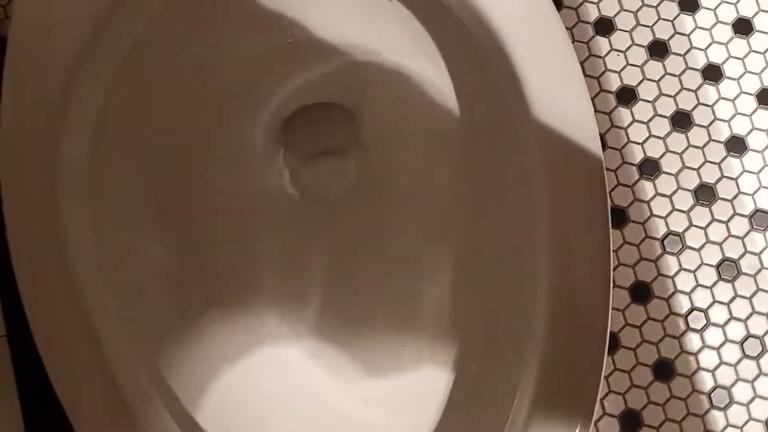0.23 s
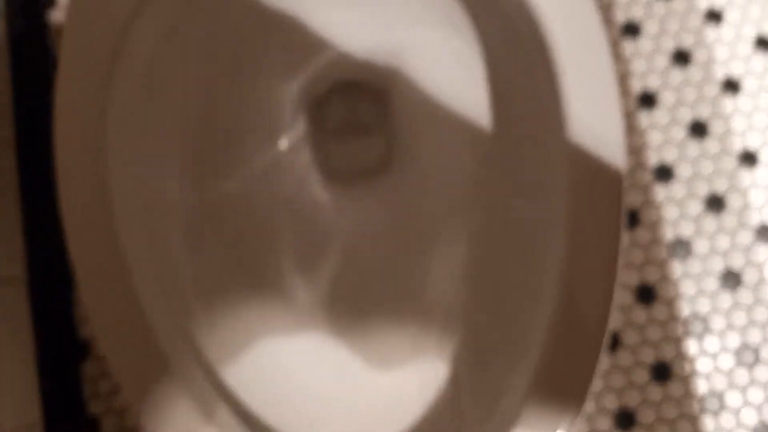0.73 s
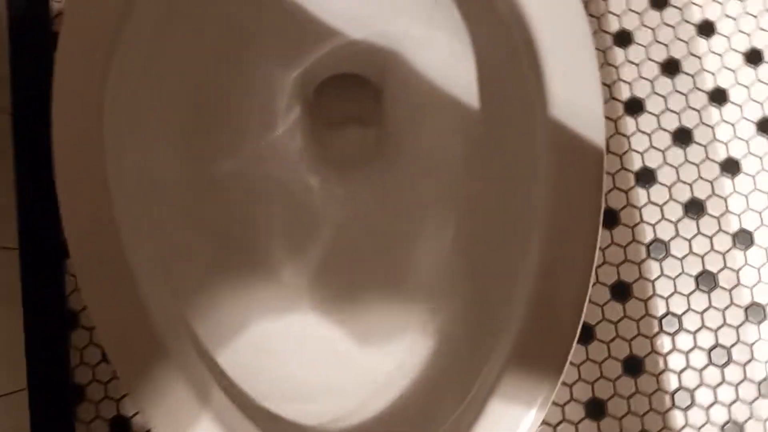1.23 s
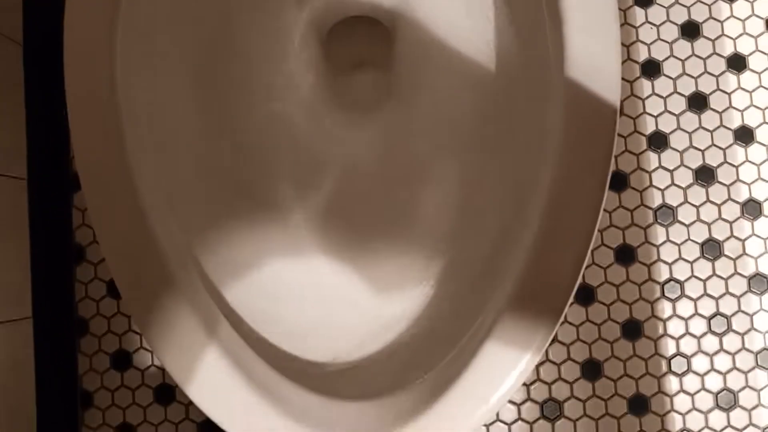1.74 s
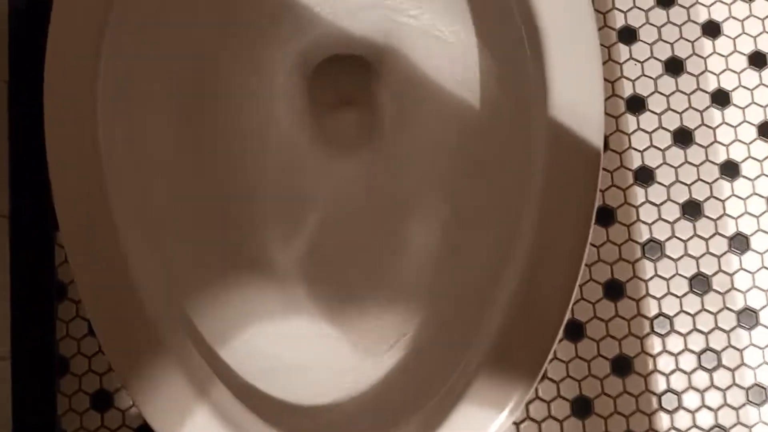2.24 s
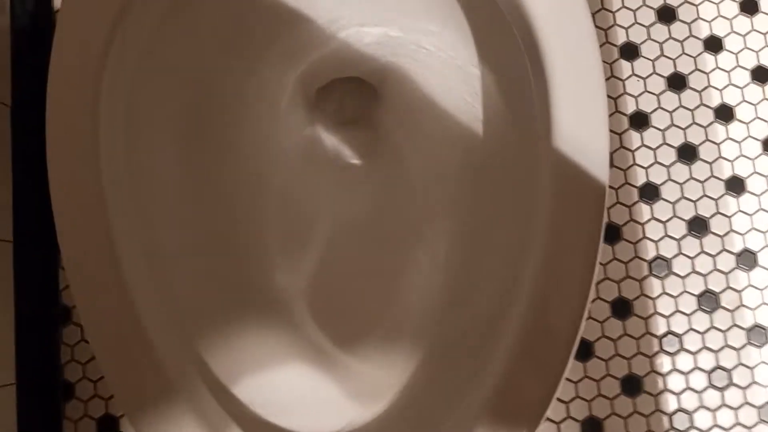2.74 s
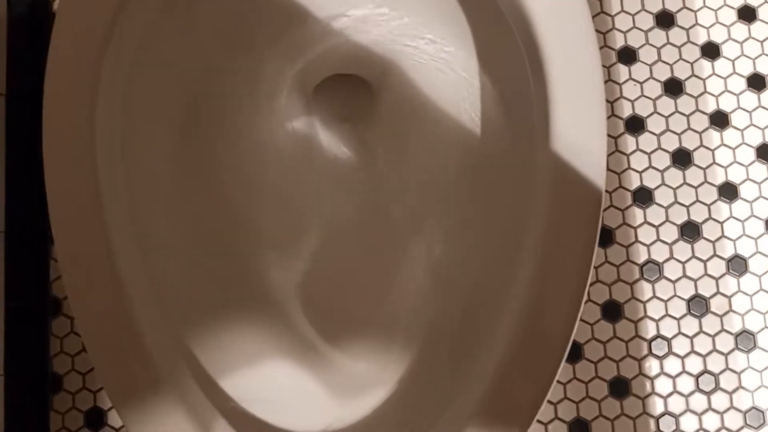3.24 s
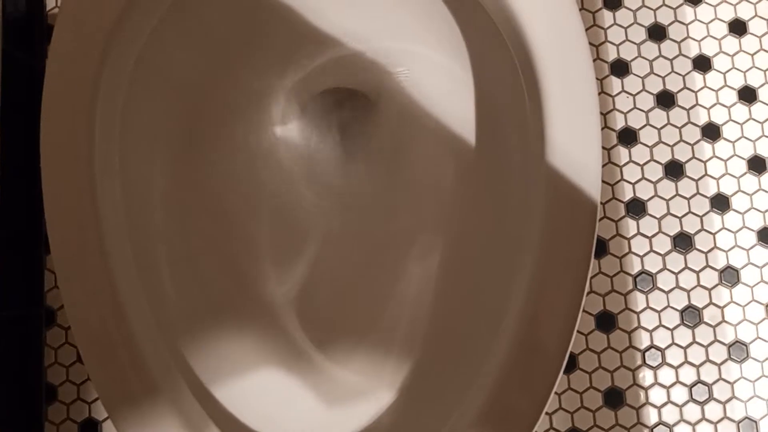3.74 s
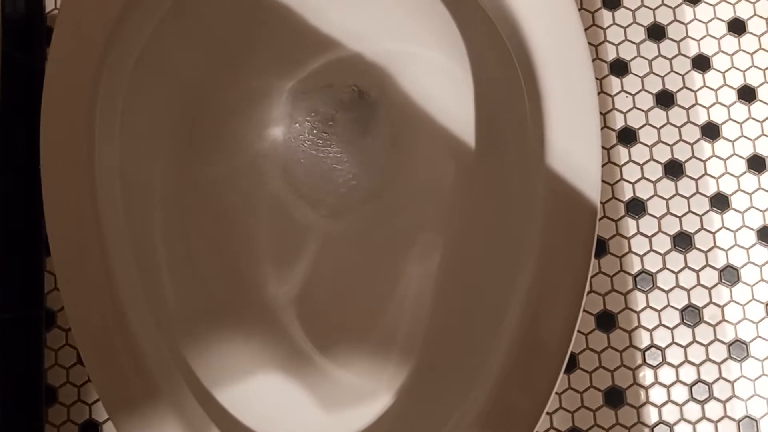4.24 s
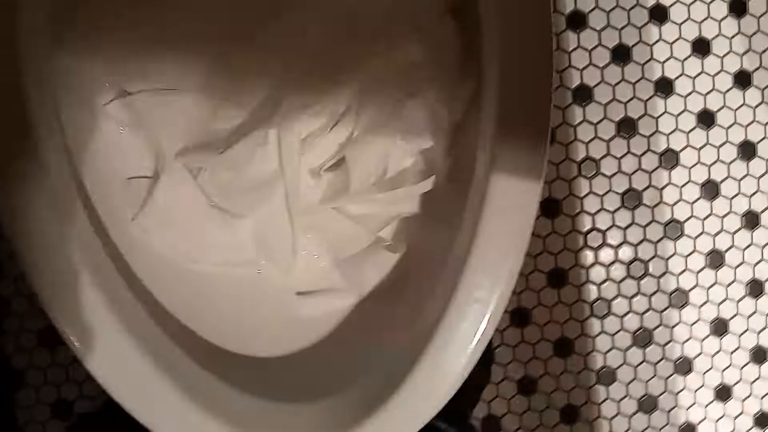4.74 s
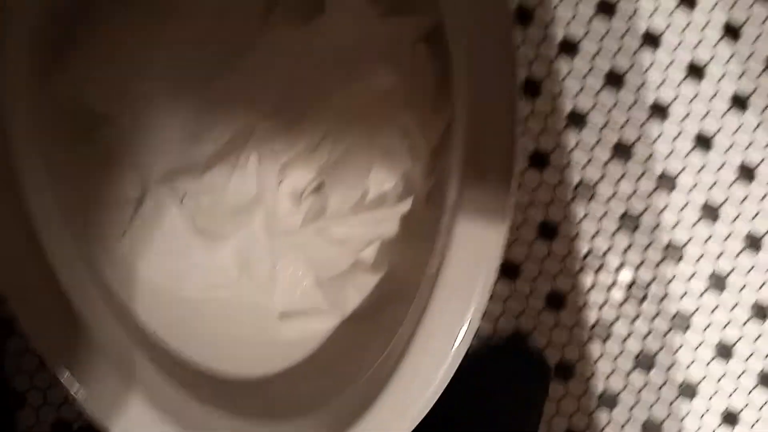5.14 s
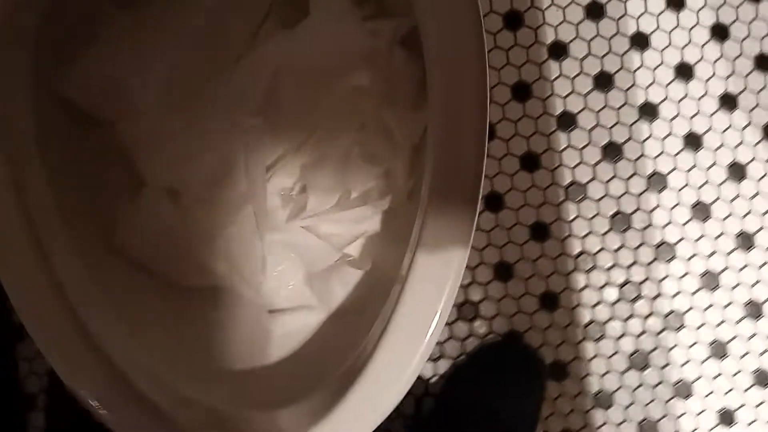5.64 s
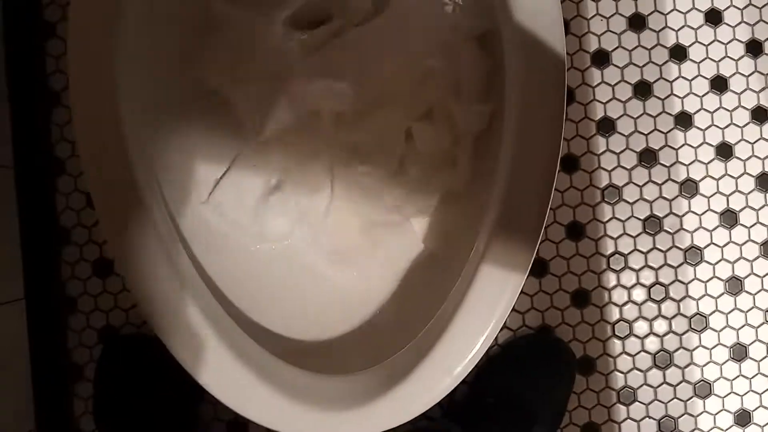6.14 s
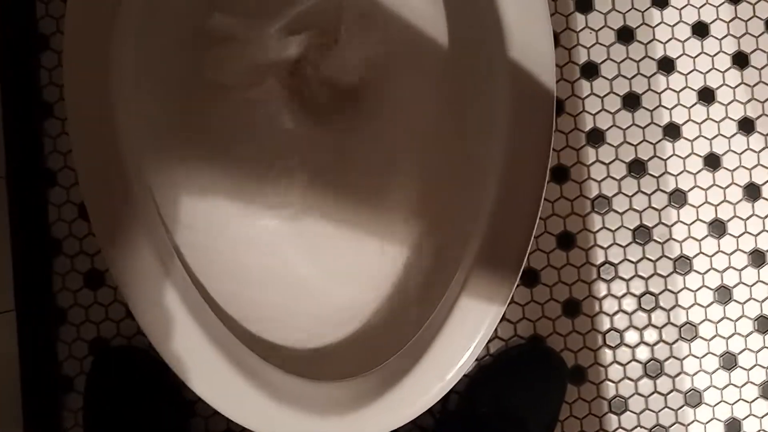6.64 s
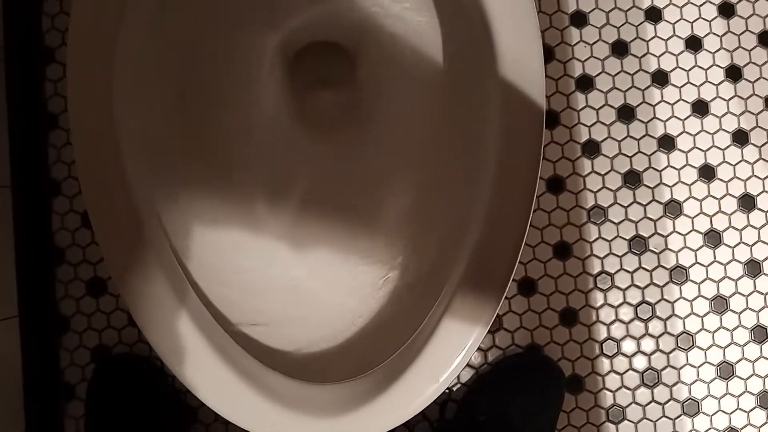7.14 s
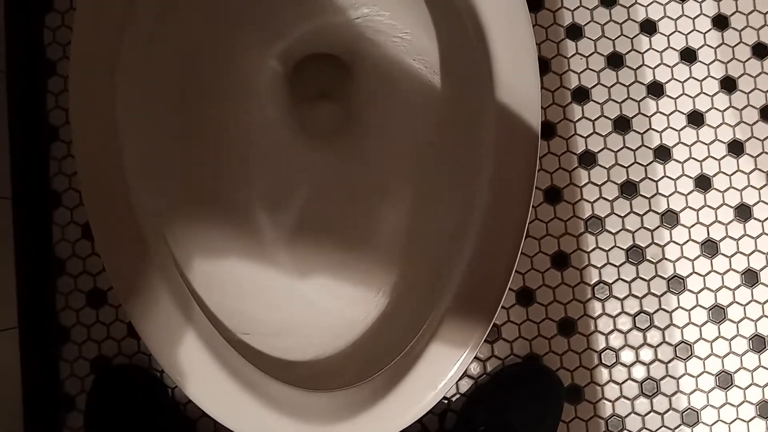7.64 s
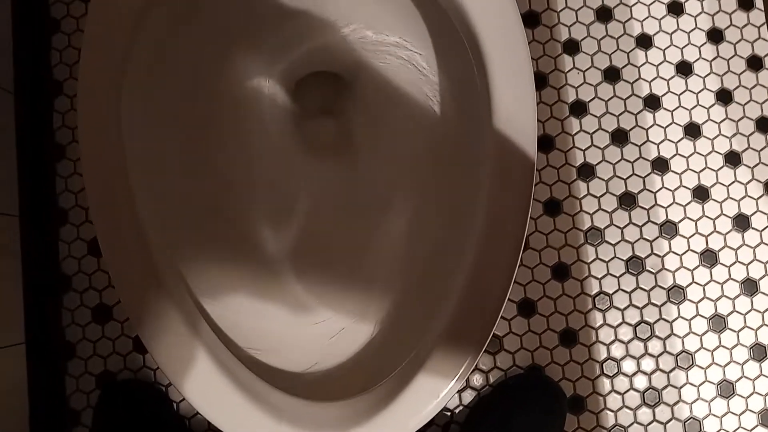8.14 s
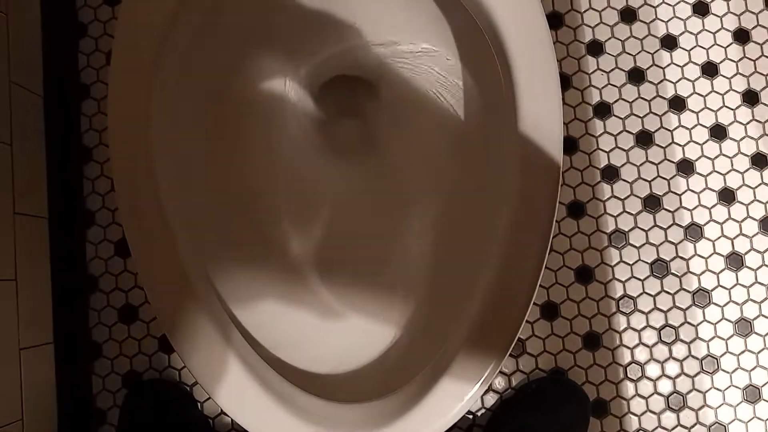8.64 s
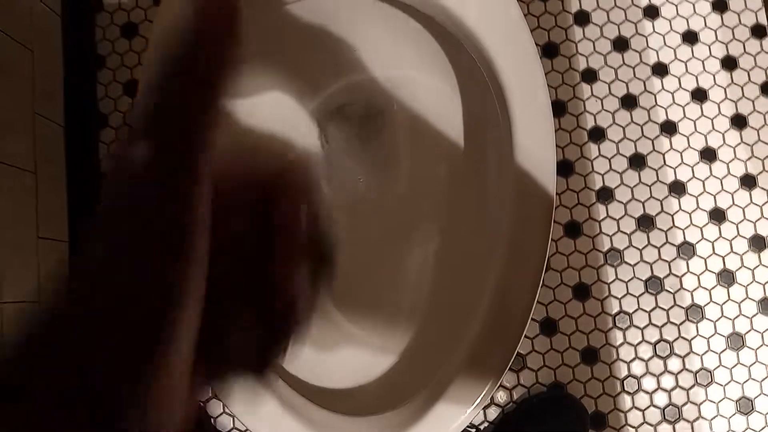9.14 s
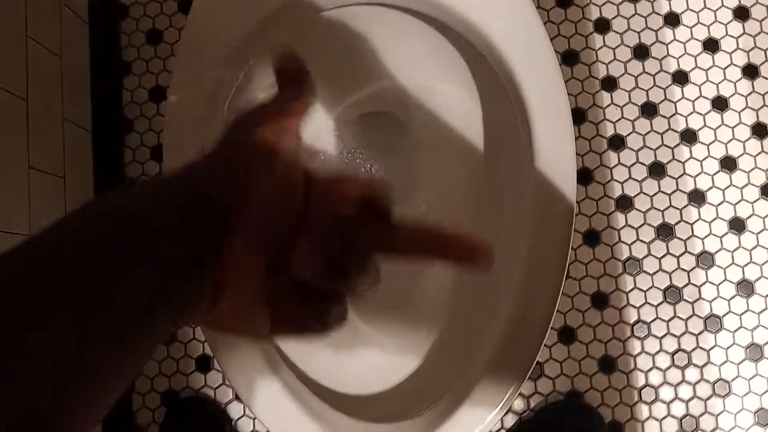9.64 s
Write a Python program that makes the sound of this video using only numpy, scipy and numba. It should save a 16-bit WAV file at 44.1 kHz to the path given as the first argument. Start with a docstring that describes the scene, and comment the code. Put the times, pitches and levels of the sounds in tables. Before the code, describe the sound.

A commercial pressure-valve toilet, heard close over the bowl in a tiled stall, is already rushing at the start. It gulps hard, breaks into bright splashing spray, then thins to trickle and fan hum. After a short cut to silence, a second flush opens with pipe thuds and a thin valve squeal, gurgles longer, sprays and dies away under the hum. Wide stereo.

```python
"""Water is already rushing and gulping through the trap of a pressure-valve toilet as its first flush opens
cold. Place: a tiled stall with a fan; distance: a phone held over the bowl; microphone: two ports, left and
right. The sound breaks off, and after a short silence the scene changes to a second flush. Swarms of ringing
bubbles over noise make the gurgle, slosh, spray, valve hiss and pipe rumble; damped sines make the gulps, ticks
and plops; wavering sines make fan and squeal. The stall lifts the water on its low modes; levels follow one
flush cycle, run at each flush's own pace."""
import sys
import numpy as np
from scipy import signal
from scipy.fft import rfft, irfft, next_fast_len
from scipy.io import wavfile
from scipy.ndimage import uniform_filter1d
from numba import njit

SR = 44100
rng = np.random.default_rng(int(sys.argv[2]) if len(sys.argv) > 2 else 0)


def log_audio(samples):
    """Write samples as a 16-bit WAV file to the path given in sys.argv[1]."""
    # one column per channel
    frames = np.atleast_2d(samples).T
    # limit to full scale, then quantise
    limited = np.clip(frames, -1, 1)
    pcm = np.round(limited * 32767).astype(np.int16)
    wavfile.write(sys.argv[1], SR, pcm)


N = 436590

TIME = np.arange(N) / SR
SIZE = next_fast_len(N + SR)
LOG_HZ = np.log(np.arange(SIZE // 2 + 1) * SR / SIZE + 1)


def undb(db):
    """Turn dB into gain."""
    return 10 ** (np.asarray(db) / 20)


def unit(x):
    """Scale to rms 1."""
    return x / np.sqrt(np.mean(x ** 2))


def columns(rows):
    """Draw each column of a curve at every sample."""
    s, *values = np.transpose(rows)
    return [np.interp(TIME, s, v) for v in values]


def ramp(start, length):
    """Climb from 0 at start to 1 at start + length."""
    return np.clip((TIME - start) / length, 0, 1)


def response(points):
    """Draw the gain at every frequency from (frequency [Hz], level [dB]) points."""
    hz, db = np.transpose(points)
    return undb(np.interp(LOG_HZ, np.log(hz), db))


def filtered(x, gain):
    """Apply a gain per frequency."""
    return irfft(rfft(x, SIZE) * gain, SIZE)[..., :N]


def walk(rate):
    """Random levels held 1 / rate s and slewed twice; spread near 1."""
    hold = int(SR / rate)
    steps = np.repeat(rng.standard_normal(N // hold + 1), hold)
    return 1.6 * uniform_filter1d(uniform_filter1d(steps, hold), hold)[:N]


def surges(rate, fall_s):
    """Sudden swells, about rate per second, that die away; mean 0, spread 1."""
    kicks = (rng.random(N) < rate / SR) * rng.random(N)
    keep = np.exp(-1 / (fall_s * SR))
    swell = signal.lfilter([1], [1, -keep], uniform_filter1d(kicks, size=60))
    swell = np.tanh(unit(swell) / 2)
    return unit(swell - swell.mean())


@njit
def ring(n, start, turn, keep, glide, size):
    """Damped sines that swell over their first cycle and rise in pitch as they die."""
    out = np.zeros(n)
    for k in range(len(start)):
        phase, step, level, i = 0., turn[k], size[k], start[k]
        while level > .02 * size[k] and i < n:
            out[i] += level * min(phase / (2 * np.pi), 1.) * np.sin(phase)
            phase += step
            step = min(step * glide[k], 2.8)
            level *= keep[k]
            i += 1
    return out


def bubbles(s, hz, t60, db, rise):
    """Bubbles decay at 60 dB per t60 s while their pitch climbs at the share rise per t60."""
    length = t60 * SR
    start = (s * SR).astype(np.int64)
    keep = 1000. ** (-1 / length)
    glide = (1 + rise) ** (1 / length)
    return ring(N, start, 2 * np.pi * hz / SR, keep, glide, undb(db))


def events(s, db, hz, t60, rise, rough, rough_hz):
    """Single bursts; a quick random tremor spreads their ring over a band."""
    return (1 + rough * walk(rough_hz)) * bubbles(s, hz, t60 + 0 * s, db, rise)


def tone(hz, width_hz, waver):
    """A sine whose level and phase waver over a narrow band."""
    phase = 2 * np.pi * np.cumsum(hz + 0 * TIME) / SR
    in_phase = (1 + waver * walk(width_hz)) * np.sin(phase)
    quarter = waver * walk(width_hz) * np.cos(phase)
    return unit(in_phase + quarter)


# low modes of the tiled stall: (frequency [Hz], width [Hz], boost [dB])
STALL_MODES = [(97.4, 6.3, 13), (142.2, 8.7, 13), (213.9, 5.4, 17), (322.8, 40, 12.5), (406, 15, 16),
               (485.7, 11, 9.5), (642, 27, 10), (793, 3.4, 17.5), (1094, 7.7, 11), (1220, 21, 8.5),
               (1358, 41, 10.5), (1663, 7.6, 12.5), (1913, 9.2, 9), (2060, 18, 10), (2187, 11, 9)]


def stall():
    """The tiled stall lifts whatever falls on its low modes; higher up they crowd into a fixed ripple."""
    hz = np.exp(LOG_HZ)
    grid = np.arange(0, SR / 2, 45.)
    ripple = np.interp(hz, grid, rng.standard_normal(len(grid)))
    low = 1 + sum((undb(db) - 1) / (1 + (2 * (hz - f) / w) ** 2) for f, w, db in STALL_MODES)
    return low * undb(3 * ripple * (hz > 2400))


SHIFT, SHIFT_PER_S = .02, 3.  # moving water retunes the modes by up to this share, this often


def retuned(modes):
    """The same modes moved up and down a little."""
    bins = np.arange(len(modes))
    return [np.interp(bins * (1 + way * SHIFT), bins, modes) for way in (-1, 1)]


def water(spectrum, cycles, spread_db, noise_db, flicker_db, count, modes, shifting=False):
    """Two unrelated streams (mid, side) of bubbles over turbulence; both flicker together."""
    streams = []
    low, high = np.log([spectrum[1][0], spectrum[-2][0]])
    for _ in range(2):
        when, pitch, big = rng.random((count, 3)).T
        hz = np.exp(low + (high - low) * pitch)
        # pitches lie evenly per octave: lift the high ones so the swarm is flat per Hz
        db = -spread_db * np.log(big + 0.0079) + 20 * np.log10(hz)
        swarm = bubbles(when * N / SR, hz, cycles / hz, db, 0.27)
        streams.append(unit(swarm) + undb(noise_db) * rng.standard_normal(N))
    streams = np.array(streams)
    out = filtered(streams, response(spectrum) * modes)
    if shifting:
        turn = np.clip(walk(SHIFT_PER_S), -1, 1)
        first, second = (filtered(streams, response(spectrum) * r) for r in retuned(modes))
        # crossfade between the modes in place and the two shifted sets
        out = (1 - abs(turn)) * out + np.maximum(turn, 0) * second + np.maximum(-turn, 0) * first
    return out / np.std(out[0]) * undb(flicker_db)


# the two flushes as the microphone hears them: (sound on [s], sound off [s])
SHOTS = [(0, 4.4985), (4.816, 9.9)]
# stages of each flush: (valve opens [s], trap breaks [s], valve shuts [s], drone and trap trim [dB],
#   drone trim after the break [dB], slosh trim [dB], valve hiss drowns from [s], sinks over [s],
#   comes clear [s], depth [dB], paper muffles the surface by [dB], washed away at [s], over [s])
FLUSHES = [(-.5, 0.598, 3.245, 0.5, 0.5, 0.5, 0.38, 0.51, 0.724, -28.5, -2.5, .7, 0.017),
           (4.855, 5.938, 8.467, 1, -2.5, -1, 5.646, 0.4, 6.58, -25, -6, 6.65, 0.28)]
# one flush cycle before the trims: (time since the valve opened [s], drone [dB], trap low mode [dB],
#   trap high mode [dB], slosh [dB], jet spray [dB], valve hiss [dB])
CYCLE = [(-.01, -77, -65, -75, -73, -81, -93), (.005, -48, -53, -53, -45, -43.5, -58),
         (.09, -32, -35.5, -36.5, -38.5, -37.5, -51), (.25, -31, -26.5, -36, -42, -40, -52),
         (.55, -38, -28, -35.5, -39, -33, -38.5), (.85, -34.5, -30, -34, -36, -32, -38),
         (1.03, -36.5, -35, -32, -35, -32.5, -34.5), (1.17, -33, -21.5, -26, -31.5, -33, -35.5),
         (1.22, -42.5, -35.5, -33, -31, -25.5, -31), (1.32, -33.5, -37, -29, -27.5, -26.5, -39),
         (1.52, -45, -40, -28.5, -28.5, -23.5, -35.5), (1.65, -55, -49.5, -39, -29, -25, -38.5),
         (2.2, -59, -50, -50.5, -35, -33, -41), (2.6, -58, -51, -45.5, -40, -36, -40.5),
         (3.1, -52.5, -54, -50.5, -41, -37.5, -42), (3.548, -63, -61.5, -54, -46, -43, -48),
         (3.9, -57.5, -60.5, -62, -57, -55.5, -61.5), (5.05, -60, -56, -70, -83.5, -72, -78)]
BREAKS_S, SHUTS_S = 1.1, 3.55  # trap breaks and valve shuts, within the cycle
CLEAR_S = 0.053  # the drowned hiss comes clear over this long
# the trap chokes and falls quiet for a moment: (time [s], level change [dB], half length [s])
LULLS = [(0.288, -6.5, 0.061), (0.493, -14, 0.029), (5.89, -2, 0.039), (6.446, -6.5, 0.077)]
# the surface wash swells or slackens: (time [s], slosh change [dB], spray change [dB], half length [s])
SWELLS = [(0.86, 1.5, 2.5, 0.042), (1.077, 6, 1, 0.04), (1.317, -6, -1.5, 0.031), (1.653, -6, -3, 0.32),
          (1.84, 2, 3.5, 0.047), (2.4, -0.5, 2.5, 0.13), (3.04, 3.5, 5, 0.14), (5.035, -1.5, -5.5, 0.066),
          (5.947, -5, 1, 0.085), (6.12, -1, -7.5, 0.028), (6.89, 0.5, 1.5, 0.067), (7.953, 0, -2, 0.098),
          (8.164, -1.5, 3, 0.1)]


def cycle():
    """Levels (dB) of six streams: every flush runs the same cycle at its own pace."""
    s, *levels = np.transpose(CYCLE)
    out = np.zeros((6, N))
    for (on, _), row in zip(SHOTS, FLUSHES):
        (opens, breaks, shuts, trap_db, drone_db, slosh_db,
         drowns, sinks, clear, depth_db, paper_db, gone, wash) = row
        age = np.interp(TIME, [opens - 1, opens, breaks, shuts, shuts + 2],
                        [-1, 0, BREAKS_S, SHUTS_S, SHUTS_S + 2])
        db = np.array([np.interp(age, s, v) for v in levels])
        db[:3] += trap_db
        db[0] += drone_db * ramp(breaks, .1)
        db[3] += slosh_db
        # paper damps the slosh less than the spray
        db[3:5] += np.outer([.6, 1], paper_db * (1 - ramp(gone - wash, wash)))
        db[5] += depth_db * ramp(drowns, sinks) * (1 - ramp(clear - CLEAR_S, CLEAR_S))
        out[:, TIME >= on] = db[:, TIME >= on]
    for at, db, half in LULLS:
        out[:3] += db * np.exp(-((TIME - at) / half) ** 2)
    for at, *db, half in SWELLS:
        out[3:5] += np.outer(db, np.exp(-((TIME - at) / half) ** 2))
    return out


# spectrum of the drone, before the stall: (frequency [Hz], level [dB per Hz])
DRONE = [(120, -94), (170, -29), (190, -10), (245, -1), (280, -26.5), (400, -72.5)]


def drone(modes):
    """Low drone of the water: few, large bubbles under strong turbulence."""
    return water(DRONE, 14.0, 0.55, 16.0, 0.43 * walk(18.0), 400, modes)


# spectra of the trap's low and high modes, before the stall: (frequency [Hz], level [dB per Hz])
GURGLE_LOW = [(170, -83.5), (230, -12), (275, -2), (340, -3), (420, -2.5), (500, -2), (580, -23.5),
              (800, -65.5)]
GURGLE_HIGH = [(350, -79.5), (480, -14.5), (560, -2.5), (700, 1.5), (880, -7.5), (1050, -7.5), (1500, -63)]


def gurgle_low(modes):
    """Low mode of the trap: bubbles ringing long under turbulence."""
    return water(GURGLE_LOW, 54.0, 0.69, 10.6, 0.18 * walk(38.0), 1500, modes)


def gurgle_high(surge, modes):
    """High mode of the trap: bubbles whose stall modes drift as the water moves."""
    return water(GURGLE_HIGH, 25.0, 0.58, 11.9, 2.0 * walk(26.0) + 0.79 * surge, 2500, modes, shifting=True)


# spectrum of the slosh, before the stall: (frequency [Hz], level [dB per Hz])
SLOSH = [(550, -71.5), (800, -4.5), (980, -1), (1350, -3), (1700, -3.5), (2300, -1.5), (2900, -4.5),
         (3500, -19), (5000, -73.5)]


def slosh(surge, modes):
    """Bubbles sloshing at the surface, surging with the spray and the hiss."""
    return water(SLOSH, 70., 1.0, 11.0, 1.1 * surge + 0.65 * walk(25.), 3000, modes, shifting=True)


# spectrum of the rim jets' spray, before the stall: (frequency [Hz], level [dB per Hz])
SPRAY = [(1800, -67), (2600, -9), (3300, -7.5), (4100, -7), (4700, -5.5), (5500, -7.5), (6400, -5),
         (7400, -9.5), (8300, -20.5), (13800, -35.5), (15300, -21), (16000, -11)]
# bright core of the spray, as a filter: (frequency [Hz], gain [dB])
JET_CORE = [(2500, -61), (3900, -22.5), (4400, -2.5), (5000, 3.5), (5600, 8), (6300, -6.5), (7200, -24),
            (10000, -54)]
CORE_DB, CORE_PER_DB = -7.5, 0.5  # core trim with the spray at -27 dB, and its growth per dB of spray
# further trim of the core, one entry per flush: (level [dB])
CORE_BY_FLUSH_DB = [0, -3.5]


def spray(spray_db, surge, modes):
    """Rim jets: a dense swarm of small bubbles whose bright core grows with the level."""
    jets = water(SPRAY, 34.0, 4.2, 7.8, 1.0 * surge + 0.6 * walk(30.), 20000, modes)
    flush_db = np.where(TIME < SHOTS[1][0], *CORE_BY_FLUSH_DB)
    core_db = CORE_DB + flush_db + CORE_PER_DB * (spray_db + 27.0)
    return jets + undb(core_db) * filtered(jets, response(JET_CORE))


# spectrum of the valve hiss, before the stall: (frequency [Hz], level [dB per Hz])
HISS = [(5500, -67.5), (7500, -10), (8800, -6.5), (10500, -5), (12500, -5.5), (13800, -6.5), (15300, 3),
        (16000, -13.5)]
OPEN_HZ, OPEN_WIDTH_HZ, OPEN_DB = 10970, 2600, -1  # band added to the hiss until it comes clear


def valve(surge, modes):
    """Hiss of the valve, gathered in one bright band early in each flush."""
    hiss = water(HISS, 48.0, 2.0, 2.1, .5 * surge + 1.1 * walk(22.0), 20000, modes)
    early = sum((TIME >= on) * (TIME < row[8]) for (on, _), row in zip(SHOTS, FLUSHES))
    band = undb(OPEN_DB) / (1 + (2 * (np.exp(LOG_HZ) - OPEN_HZ) / OPEN_WIDTH_HZ) ** 4)
    return hiss + early * filtered(hiss, band)


def flush(modes):
    """Streams of water and air, as mid and side; shared surges tie the surface, high trap mode and hiss."""
    drone_db, low_db, high_db, slosh_db, spray_db, hiss_db = cycle()
    surge = surges(18., 0.018)
    out = undb(drone_db) * drone(modes)
    out = out + undb(low_db) * gurgle_low(modes)
    out = out + undb(high_db) * gurgle_high(surge, modes)
    out = out + undb(slosh_db) * slosh(surge, modes)
    out = out + undb(spray_db) * spray(spray_db, surge, modes)
    return out + undb(hiss_db) * valve(surge, modes)


# large air pockets, and the low thump at 144 Hz as the valve opens at 4.93 s, before the stall and a common
# trim: # (time [s], level [dB], pitch [Hz], length [s])
GULPS = [(.0, -19.5, 392, .2), (.33, -21.5, 388, .12), (.47, -21.5, 678, 0.03), (.65, -16, 316, 0.045),
         (.6, -12, 628, .13), (.735, -23, 1167, 0.042), (.79, -20, 1380, .03), (1.16, -21.5, 1087, .08),
         (1.38, -29, 1464, 0.033), (1.379, -26.5, 690, 0.045), (1.74, -32.5, 1315, .09),
         (1.78, -27.5, 1550, 0.057), (1.95, -27, 706, .08), (2.293, -31, 958, .06), (4.93, -13.5, 144, .12),
         (5.04, -18, 394, 0.095), (5.16, -16, 375, .08), (5.2, -24, 660, .05), (5.29, -21, 630, .08),
         (5.36, -22, 408, .05), (5.5, -25.5, 654, 0.037), (5.59, -23.5, 650, .08), (5.69, -23, 400, .04),
         (5.79, -29, 647, .04), (6.03, -19, 399, 0.087), (6.1, -22.5, 1088, 0.13), (6.164, -18, 649, 0.037),
         (6.284, -16, 708, 0.065), (6.2, -25, 870, 0.098), (6.34, -15.5, 932, .07),
         (6.466, -20.5, 1037, .03), (6.58, -26, 1126, 0.035), (6.91, -27, 1230, 0.068),
         (7.0, -25.5, 305, .11), (7.043, -27, 812, 0.072), (7.16, -29.5, 301, .12), (7.31, -29, 1050, 0.06),
         (7.31, -33, 1314, 0.066), (7.7, -32, 795, .07), (7.85, -36, 1000, 0.027)]
GULP_T60_S, GULP_SCATTER = 0.072, 0.058  # ring of each bubble; pitches differ by up to this share either way


def gulps(modes, count):
    """Each air pocket breaks up into count bubbles spread over its length, as mid and side."""
    s, db, hz, length = np.repeat(GULPS, count, axis=0).T
    late, scatter = rng.random((len(s), 2)).T
    when = s + length * (np.arange(len(s)) % count + .5 * late) / count
    pitch = hz * (1 + GULP_SCATTER * (2 * scatter - 1))
    mid = events(when, db, pitch, GULP_T60_S, 0.078, 0.26, 90.)
    side = events(when, db - 16.0, pitch, GULP_T60_S, .05, 1.7, 60.)
    return filtered(np.array([mid, side]), undb(-5.0) * np.sqrt(modes))


# fan hum in the stall, faint under the loud flush and louder as each flush dies: (time [s], blade tone level
# [dB])
FAN = [(0, -67), (1.4, -62.5), (2.7, -57.5), (3.17, -51.5), (3.25, -48), (4.5, -52), (4.82, -51.5),
       (6.06, -45.5), (6.38, -58.5), (8.2, -52), (8.55, -41.5), (8.95, -41.5), (9.9, -44.5)]
# motor lines, before they throb: (frequency [Hz], level against the blade tone [dB], width [Hz])
FAN_LINES = [(59, -14, 14), (96.4, -18, 14), (175, -12, 11)]
# spectrum of the moving air: (frequency [Hz], level before scaling to AIR_DB [dB per Hz])
AIR = [(15, -55), (25, -19.5), (96, -16), (157, -16.5), (211, -10.5), (307, -15), (361, -12.5), (1060, -28),
       (4950, -38.5), (15800, -63.5)]
FAN_HZ, AIR_DB = 154, -53.5  # blade tone; overall level of the air


def fan():
    """Steady blade tone, weaker motor lines that throb, and moving air, as mid and side."""
    db, = columns(FAN)
    blade = tone(FAN_HZ, 16., .16)
    blade = blade + undb(-15) * tone(2 * FAN_HZ, 8., .35)
    throb = 1 + .75 * np.sin(2 * np.pi * np.cumsum(5.4 + walk(2.)) / SR)
    lines = blade + throb * sum(undb(d) * tone(f, w, .6) for f, d, w in FAN_LINES)
    air = filtered(rng.standard_normal((2, N)), response(AIR))
    mid_side = np.array([[1], [.2]])
    return undb(db) * lines * mid_side + undb(AIR_DB) * unit(air)


# spectrum of the pipe rumble, before the stall: (frequency [Hz], level [dB per Hz])
RUMBLE = [(30, -72), (52, 0), (70, -13), (95, -3.5), (140, -7), (175, -17.5), (250, -71.5)]
# thuds in the supply pipe: (time [s], level [dB], hold [s])
THUDS = [(0.075, -40.5, 0.034), (0.429, -44, 0.019), (1.214, -50, 0.045), (1.592, -49, 0.057),
         (4.877, -31.5, 0.027), (4.935, -26.5, 0.125), (5.16, -37, 0.062), (5.42, -27.5, 0.049)]
THUD_RISE_S, THUD_FALL_DB_S, PIPE_REST_DB = .03, 146.5, -59  # rise [s], fall [dB/s], level at rest [dB]


def thuds():
    """Gain of the pipe rumble: a quiet rest and thuds that rise, hold and fall."""
    gain = undb(PIPE_REST_DB)
    for s, db, hold in THUDS:
        fall_db = THUD_FALL_DB_S * np.maximum(TIME - s - hold, 0)
        gain = gain + ramp(s - THUD_RISE_S, THUD_RISE_S) * undb(db - fall_db)
    return gain


def pipe(modes):
    """The supply pipe rumbles: deep, sparse bubbles under turbulence, shaped by the thuds."""
    return thuds() * water(RUMBLE, 11.0, 0.89, 7.6, .7 * walk(9.2), 300, modes)


# splashes and ticks, before their tremor: (time [s], level [dB], pitch [Hz])
TICKS = [(.364, -32, 5550), (.715, -28, 5500), (0.834, -32, 5180), (1.0425, -23, 4990), (1.081, -34, 5930),
         (3.654, -45, 6100), (3.738, -58, 4440), (4.857, -43.5, 3820), (4.939, -34, 1260),
         (5.072, -39.5, 692), (6.956, -32, 4930), (7.98, -40, 2420), (8.681, -47, 5900),
         (8.764, -51.5, 6270), (8.925, -55, 6100), (9.317, -59, 5900)]
TICK_T60_S = 0.086


def ticks():
    """Splashes and ticks: short damped sines made rough by a fast tremor."""
    return events(*np.transpose(TICKS), TICK_T60_S, 0.042, 1.95, 2500.)


# single bubbles that pop and ring: (time [s], level [dB], pitch [Hz], ring to -60 dB [s])
PLOPS = [(.572, -8.5, 708, 0.037), (.586, -4.5, 654, 0.032), (.612, -15, 682, .04),
         (0.631, -7.5, 480, 0.039), (.652, -6.5, 622, .05), (.665, -12, 378, 0.051),
         (.712, -11, 675, 0.046), (.776, -18.5, 1140, 0.066), (0.799, -14.5, 1378, 0.043),
         (1.356, -28, 1350, 0.26), (1.51, -26.5, 1350, 0.21), (1.577, -34, 1674, 0.32),
         (1.65, -30, 1343, 0.2), (1.714, -32, 1520, .2), (1.893, -35, 1346, 0.78), (1.989, -36, 1295, 0.26),
         (2.521, -35, 1380, 0.21), (2.54, -33, 1670, 0.27), (2.108, -39, 1670, 0.36),
         (2.88, -33.5, 2025, .15), (3.0, -34, 2040, .1), (3.07, -37, 1060, 0.18), (5.07, -16, 388, .05),
         (5.16, -15, 387, 0.072), (5.182, -5.5, 340, 0.058), (5.213, -15, 380, .05),
         (5.465, -15, 390, 0.062), (5.961, -12, 327, 0.068), (5.981, -18, 620, 0.1),
         (6.374, -9.5, 820, 0.056), (6.85, -31, 883, 0.4), (6.957, -19, 1230, 0.043),
         (6.96, -25, 800, 0.061), (6.961, -23, 1550, .03), (7.048, -19, 800, 0.063),
         (7.72, -38, 1420, 0.35), (7.967, -30, 1100, 0.023)]
PLOP_RISE = 0.016  # share by which the pitch climbs per ring time


def plops():
    """Single bubbles pop and ring as clean damped sines."""
    s, db, hz, ring_s = np.transpose(PLOPS)
    return bubbles(s, hz, ring_s, db, PLOP_RISE)


# air pocket that shrinks as the trap refills, before the stall:
#   (starts [s], stops [s], loud for [s], climb time [s], level before a common gain [dB])
POCKETS = [(.7, 3.72, 0.085, 0.12, -30), (5.954, 6.5, 0.52, .35, -29)]
POCKET_FROM_HZ, POCKET_TO_HZ, POCKET_SAG_HZ_S = 600, 1382, 43.5  # pitch climbs between these, less the sag
POCKET_RISE_S, POCKET_DROP_DB, POCKET_FADE_DB_S = 0.034, -10, 6  # onset, drop after the loud part, fade


def siphon(modes, count):
    """Bubbles scattered about the climbing pitch of the shrinking air pocket, as mid and side."""
    hz, gain = np.full(N, 1. * POCKET_FROM_HZ), 0
    for start, stop, loud, climb, db in POCKETS:
        age = np.clip(TIME - start, 0, None) * (TIME < stop)
        climbed = (POCKET_TO_HZ - POCKET_FROM_HZ) * (1 - np.exp(-age / climb))
        hz = hz + climbed - POCKET_SAG_HZ_S * age
        fall_db = POCKET_DROP_DB * ramp(start + loud, POCKET_RISE_S) - POCKET_FADE_DB_S * age
        gate = ramp(start, POCKET_RISE_S) * (1 - ramp(stop - .05, 0.056))
        gain = gain + gate * undb(db + fall_db)
    streams = []
    for _ in range(2):
        when = rng.random(count) * N / SR
        big, scatter = rng.exponential(size=count), rng.standard_normal(count)
        pitch = np.interp(when, TIME, hz) * np.exp(0.1496 * scatter)
        streams.append(unit(bubbles(when, pitch, 90. / pitch, 2.0 * big, 0.049)))
    return gain * filtered(np.array(streams), 1.36 * np.sqrt(modes))


# squeal of the opening valve: (time [s], pitch [Hz], level [dB])
SQUEAL = [(4.857, 2660, -42), (4.92, 2480, -58), (4.95, 2400, -48), (5.0, 2400, -64), (5.08, 2700, -56),
          (5.16, 2950, -49), (5.195, 3060, -55), (5.225, 3130, -43), (5.33, 3110, -46), (5.5, 3040, -47),
          (5.62, 3010, -51), (5.76, 2970, -47), (5.83, 2920, -49), (5.92, 2790, -51), (6.02, 2740, -60),
          (6.1, 2740, -120)]


def squeal():
    """The valve seat whistles breathily and unevenly while it opens, with a fainter line below."""
    hz, db = columns(SQUEAL)
    whistle = tone(hz + 15 * walk(25.), 190., 1.3)
    below = undb(-6) * tone(0.75 * hz, 300., 2.)
    return undb(db + 1.5 * walk(35.)) * (whistle + below) * (TIME >= SQUEAL[0][0])


# gain into the side channel: (frequency [Hz], side minus mid [dB])
WIDTH = [(60, -26), (110, -20), (200, -13), (380, -8), (700, -6), (1290, -3), (2380, -1), (4400, 0),
         (8120, 0), (15000, 0)]
# balance of the microphone ports, one curve per flush: (frequency [Hz], left minus right [dB])
LEAN = [(60, -0.5), (110, 0.0), (200, 1.0), (380, -0.5), (700, 0.5), (1290, -4.0), (2380, 2.5), (4400, 4.0),
        (8120, 3.0), (15000, -0.5)], [(60, -1.0), (110, -1.0), (200, 0.5), (380, -0.5), (700, 2.0),
        (1290, -0.5), (2380, 1.5), (4400, 5.5), (8120, 7.5), (15000, 2.5)]
# the hand turns the phone a little: (time [s], left minus right [dB])
TURN = [(0, 0.5), (1.1, 0), (1.7, 0), (2.8, -1), (4.3, 1.5), (5.2, -1.4), (6.2, 1.5), (7.7, 0), (8.3, 0),
        (9.2, -1), (9.9, -1)]


def scene():
    """Spread mid and side over two ports and keep silence between the flushes."""
    modes = stall()
    water_and_air = flush(modes) + gulps(modes, count=9) + pipe(modes) + siphon(modes, count=2000)
    mid, side = water_and_air + fan() + squeal()
    mid = mid + ticks() + plops()
    # part of the side is the mid itself a quarter cycle late: one port hears the bowl first
    late = 0.5 / (1 + np.exp(LOG_HZ) / 4500.0)
    width = response(WIDTH)
    side = filtered(side, np.sqrt(1 - late ** 2) * width) + filtered(mid, -1j * late * width)
    out = 0
    for (on, off), lean in zip(SHOTS, LEAN):
        tilt = np.sqrt(response(lean))
        ports = filtered(np.array([mid + side, mid - side]), np.array([tilt, 1 / tilt]))
        out = out + ports * (TIME >= on) * (TIME < off)
    turn_db, = columns(TURN)
    return out * undb(np.array([turn_db, -turn_db]) / 2)


TOP_HZ = 15550  # upper limit of the phone's microphone


def record(dry):
    """The phone cuts the deep bass and the top."""
    firm = signal.sosfilt(signal.butter(2, 42., "high", fs=SR, output="sos"), dry)
    return signal.sosfilt(signal.ellip(10, .2, 80, TOP_HZ, fs=SR, output="sos"), firm)


dry = scene()
out = record(dry)
log_audio(out)
```